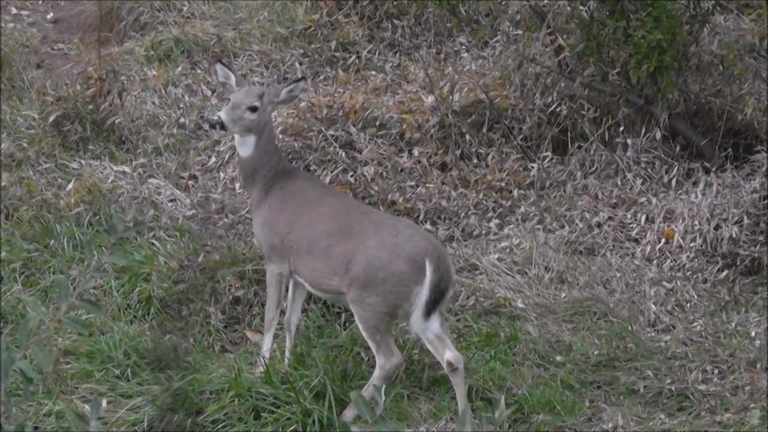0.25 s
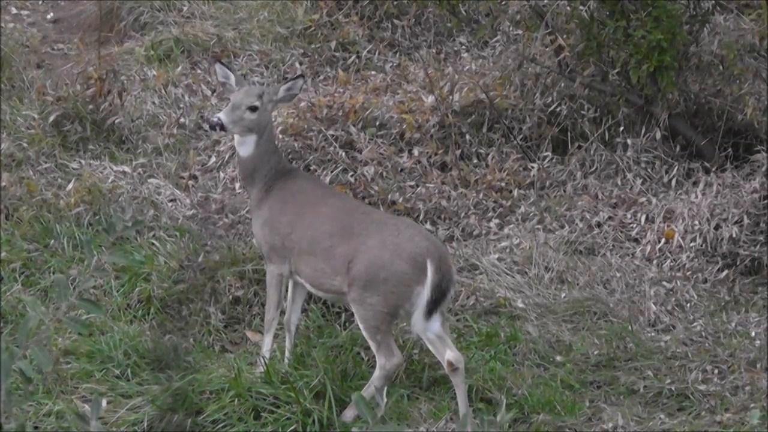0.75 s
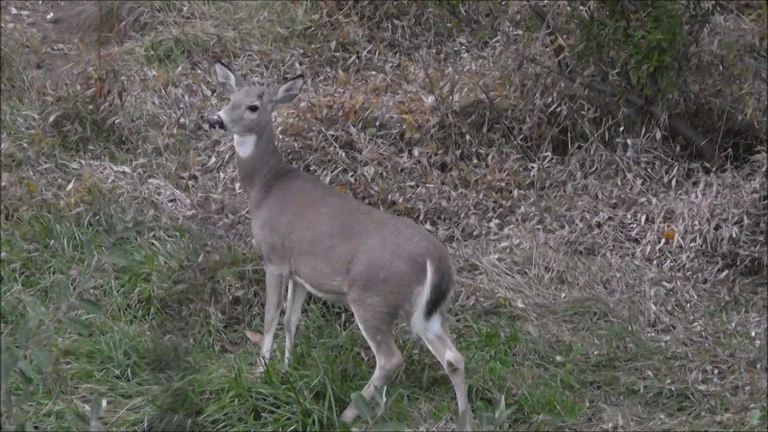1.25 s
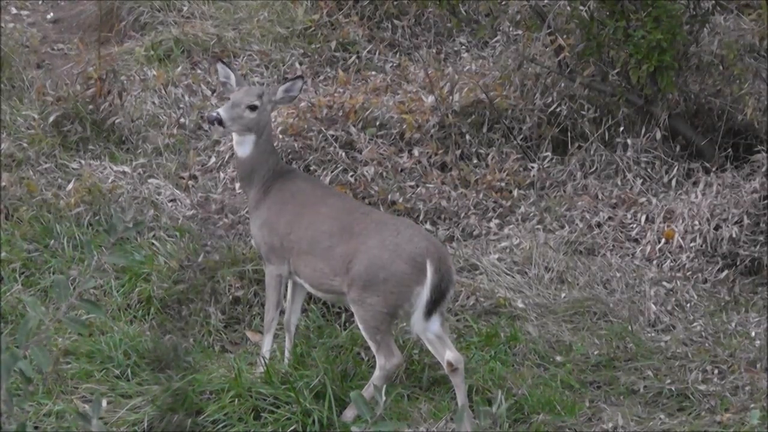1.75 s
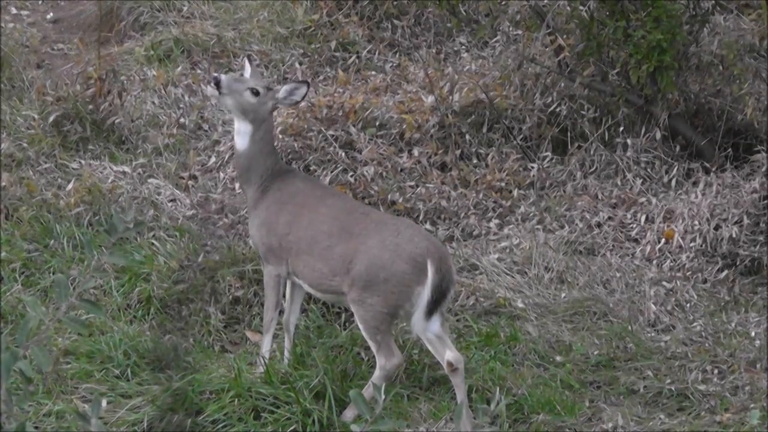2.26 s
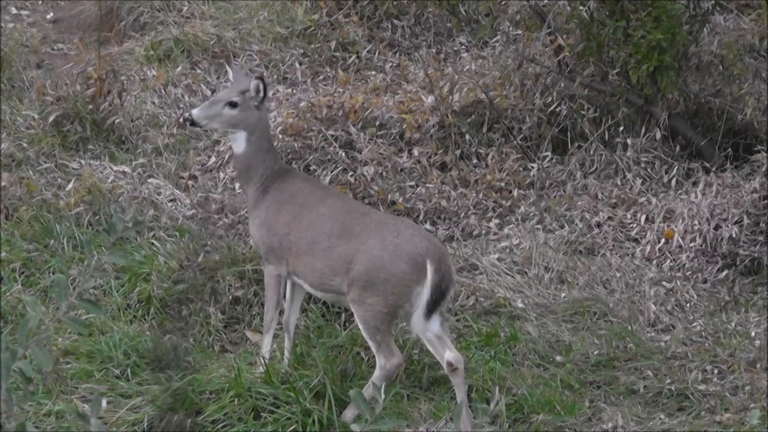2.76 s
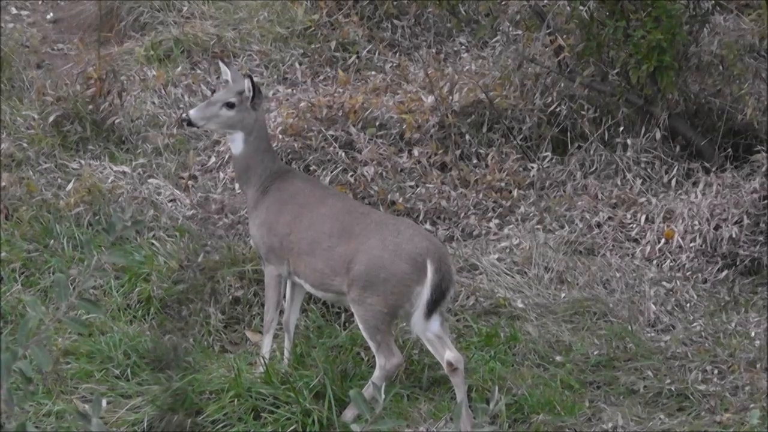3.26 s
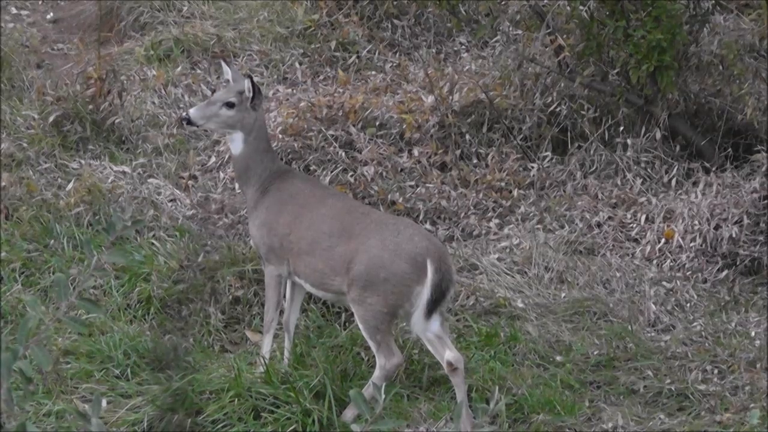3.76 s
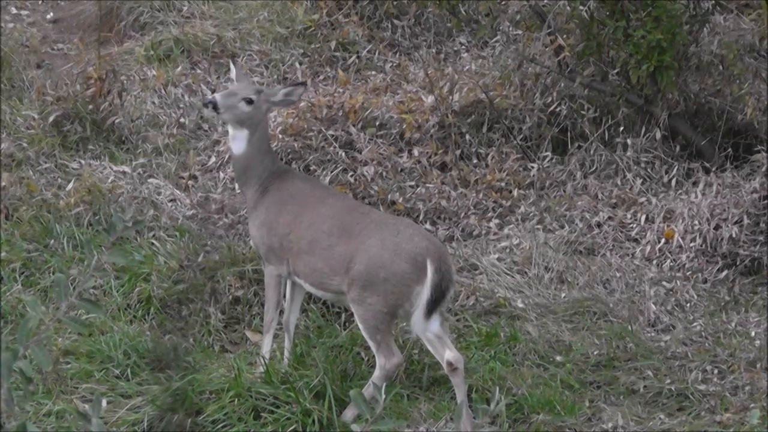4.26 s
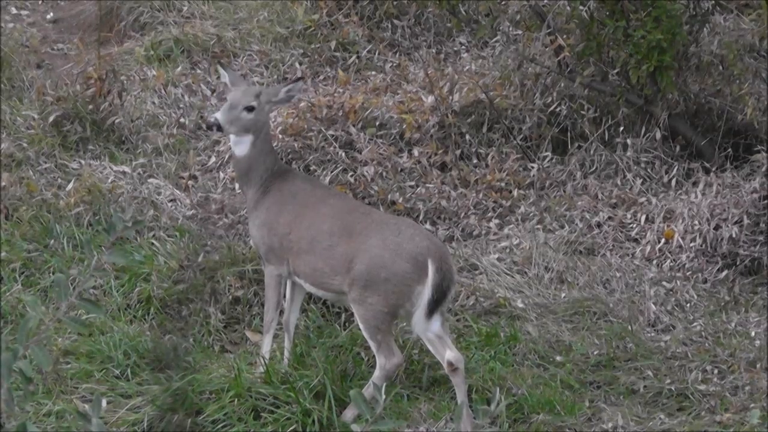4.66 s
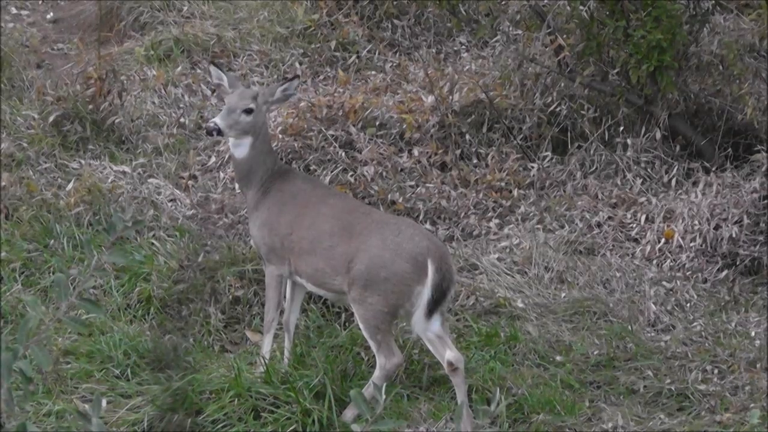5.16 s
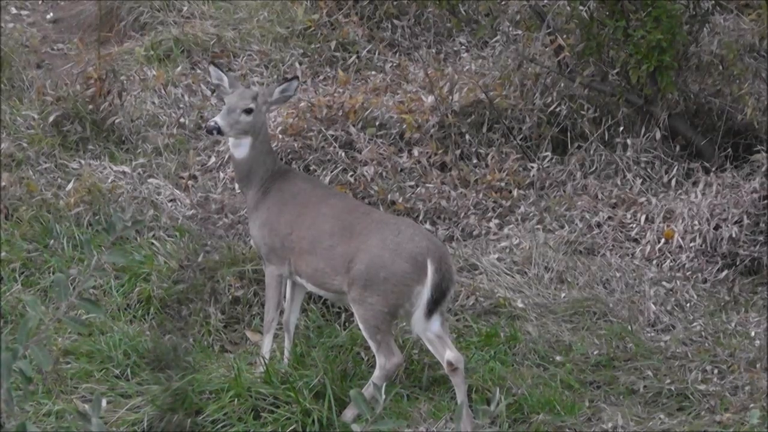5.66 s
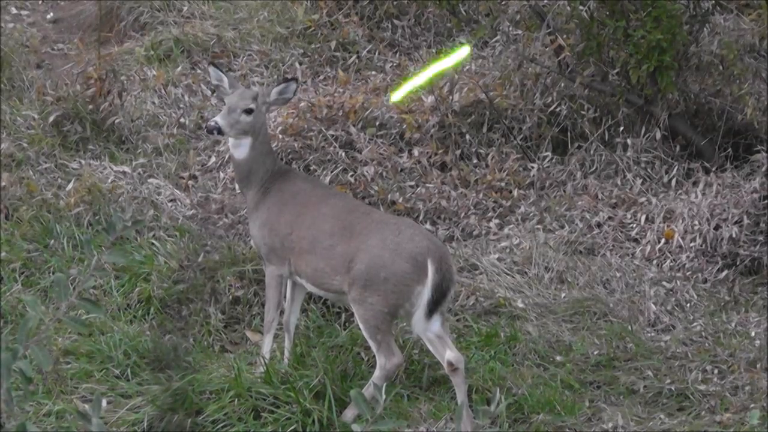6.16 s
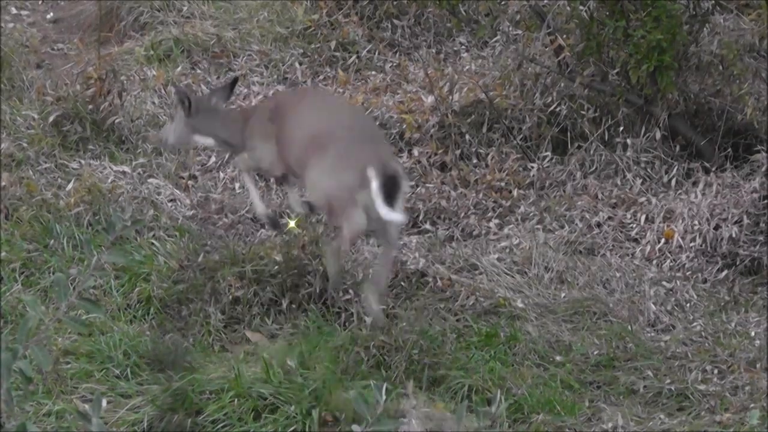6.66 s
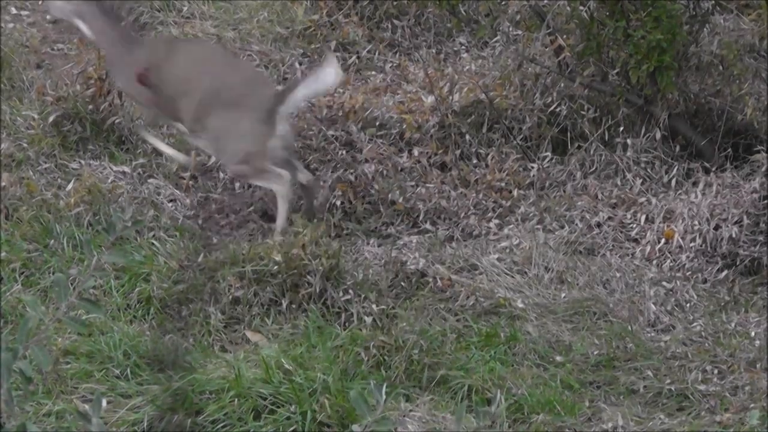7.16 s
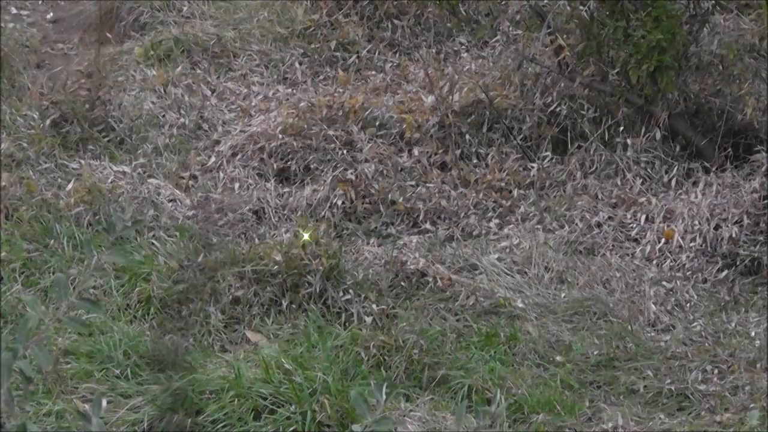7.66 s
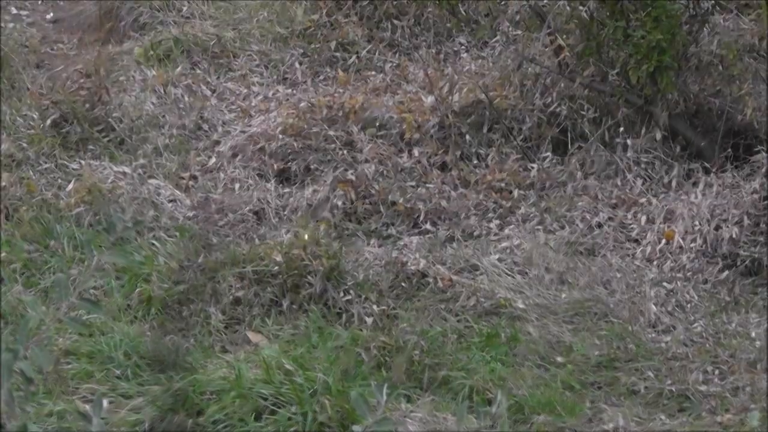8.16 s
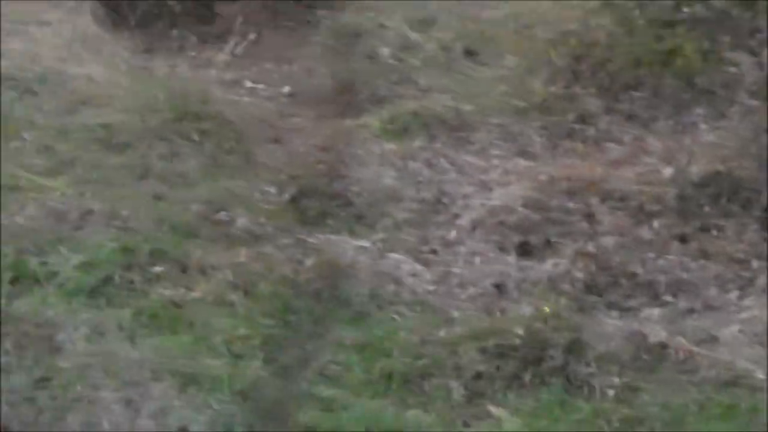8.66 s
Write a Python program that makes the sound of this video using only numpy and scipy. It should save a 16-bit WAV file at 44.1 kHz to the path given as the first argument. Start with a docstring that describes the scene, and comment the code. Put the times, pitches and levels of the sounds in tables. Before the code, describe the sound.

A stereo microphone close to a crossbow hears a calm woodland: faint low air rumble, small hoarse bird chirps, a brief insect trill, an occasional tiny twig tick. Suddenly the bow releases with a hard multi-part snap and low hum; a quarter second later comes a duller hollow impact. Leaves rustle and crunch in uneven bounds, with sharp twig snaps and a woody hoof knock, while the level stays pressed down before recovering.

```python
"""Quiet woods: a low rumble of shaped noise throughout; birds chip as gliding tones from the start, with far calls,
and at 1.1 s a cricket trills in short pulses. Sparse twig snaps are short band-limited puffs of noise.
At 6.2 s a crossbow is loosed close by: noise cracks over decaying modes and a hum. The bolt hisses in flight,
then knocks on a hollow body at 6.46 s; a deer bolts away through crackling leaves, its hooves ringing dead wood.
Gain control drops the level after the loud sounds, holds it down and lets it creep back."""
import sys
import numpy as np
from scipy import signal
from scipy.fft import rfft, irfft
from scipy.io import wavfile
from scipy.ndimage import uniform_filter1d, minimum_filter1d

SR = 44100
rng = np.random.default_rng(int(sys.argv[2]) if len(sys.argv) > 2 else 0)


def amp(db):
    return 10 ** (np.asarray(db, float) / 20)


def bounce(signal):
    """Save signal as a 16-bit WAV file at the path given by the first command-line argument."""
    frames = np.transpose(np.atleast_2d(signal))
    limited = np.clip(frames, -1, 1)
    pcm = np.round(limited * 32767).astype(np.int16)
    wavfile.write(sys.argv[1], SR, pcm)


N = 392479  # samples


def read(points, hz):
    """Interpolation of a spectrum, linear on a log-frequency axis."""
    f, value = np.transpose(points)
    return np.interp(np.log(hz + 1), np.log(f + 1), value)


def evened(x):
    """Normalization to unit rms."""
    return x / np.sqrt(np.mean(x ** 2) + 1e-20)


def add(mix, start_s, sound, lean_db=0):
    """Superposition at a start time, with a left-right level difference."""
    part = mix[:, round(start_s * SR):][:, :sound.shape[-1]]
    part += sound[..., :part.shape[1]] * amp(np.array([[lean_db / 2], [-lean_db / 2]]))


def coloured(x, db_of):
    """Minimum-phase filtering: the cepstrum of the gain db_of(hz) yields a causal response."""
    gain_db = np.maximum(db_of(abs(np.fft.fftfreq(4096, 1 / SR))), -100)
    log_gain = np.log(amp(gain_db))
    taps = np.fft.ifft(np.exp(np.conj(signal.hilbert(log_gain)))).real[:2048]
    return signal.oaconvolve(np.atleast_2d(x), taps[None], axes=1)


def pair(count, same):
    """Partial coherence: two noises that share the correlation `same`."""
    a, b = rng.standard_normal((2, count))
    return np.array([a, same * a + np.sqrt(1 - same ** 2) * b])


def burst(t60_s, same, rise_s):
    """Exponential decay of a noise puff after a linear rise."""
    t = np.arange(round(1.4 * t60_s * SR)) / SR
    return pair(len(t), same) * amp(-60 * t / t60_s) * np.minimum(t / rise_s, 1)


def tone(hz, edge):
    """Phase as the integral of frequency: a sine on a pitch curve with tapered ends."""
    return np.sqrt(2) * np.sin(2 * np.pi * np.cumsum(hz) / SR) * signal.windows.tukey(len(hz), edge)


def modes(table, t):
    """Modal superposition: decaying sines from rows of pitch, level and decay time."""
    return sum(amp(db - 60 * t / t60_s) * np.sin(2 * np.pi * hz * t) for hz, db, t60_s in table)


def woods(x, t60_s, start_s):
    """Multiple scattering from trunks: sparse echoes of random sign that die away."""
    at = np.arange(round(start_s * SR), SR // 2, 40)
    at = at + rng.integers(0, 40, (2, len(at)))
    taps = np.zeros((2, SR // 2 + 40))
    np.put_along_axis(taps, at, rng.standard_normal(at.shape) * amp(-60 * at / SR / t60_s), 1)
    return signal.oaconvolve(x, taps / np.linalg.norm(taps[0]), axes=1)[:, :N]


def patchy(x, frame, depth_db, size):
    """Spectro-temporal modulation: random patches of size (bins, frames) rise and sink."""
    overlap = frame * 3 // 4
    z = signal.stft(x, nperseg=frame, noverlap=overlap)[2]
    field = uniform_filter1d(rng.standard_normal(z.shape[1:]), size=size[0], axis=0)
    field = evened(uniform_filter1d(field, size=size[1], axis=1))
    return signal.istft(z * amp(depth_db * field), nperseg=frame, noverlap=overlap)[1][:, :N]


# Likeness of far sound at the two microphone ports: [pitch_hz, correlation (no unit)]
PORT_LIKENESS = [(60, 0.63), (130, 0.97), (290, 0.91), (640, 0.74), (1410, 0.11), (3100, 0.89),
                 (6820, 0.81), (15000, 0.3)]
# Level difference of the ports: [pitch_hz, left_minus_right_db]
PORT_LEAN = [(60, -5.5), (180, -4), (550, -2.5), (1650, 1), (4970, 0), (15000, 1)]
# Phase difference of the ports: [pitch_hz, left_lead_rad]
PORT_LEAD = [(0, 0.026), (520, 0.11), (2330, 0.14), (3190, 0.0), (15300, 0.012), (16300, 0.038)]


def ports(x):
    """Diffuse-field coherence: two unrelated signals become partly alike at the ports."""
    hz = np.fft.rfftfreq(N, 1 / SR)
    a, b = rfft(x[:, :N])
    same = np.clip(read(PORT_LIKENESS, hz), -1, 1)
    half = amp(read(PORT_LEAN, hz) / 2) * np.exp(.5j * read(PORT_LEAD, hz))
    return irfft(np.array([a * half, (same * a + np.sqrt(1 - same ** 2) * b) / half]), N)


# Spectrum of the background rumble: [pitch_hz, gain_db]
AIR_COLOUR = [(30, -34), (90, -7), (165, 0.5), (318, -0.5), (436, -7), (647, -11.5), (1060, -26.5),
              (1750, -35), (2160, -28.5), (2400, -34.5), (3290, -35), (4630, -41), (15500, -43.5)]


def air():
    """Stationary random noise: a low diffuse rumble with faint drifting patches."""
    noise = patchy(rng.standard_normal((2, N)), 2048, .9, size=(16, 12))
    hz = np.fft.rfftfreq(N, 1 / SR)
    rumble = irfft(rfft(noise) * amp(read(AIR_COLOUR, hz)), N)
    return amp(-47) * evened(ports(rumble))


# The cricket's note: [level_db, pitch_hz, climb_hz_per_s, swell_db_per_s]
TRILL_NOTE = -58.5, 3222, 150, 4
# The cricket's timing: [start_s, pulse_gap_s]
TRILL_TIMING = 1.1465, .0441


def cricket(count=10):
    """Pulsed pure tone: varied pulses drop onto a note that creeps up in pitch and level."""
    out = np.zeros((2, N))
    start_s, gap_s = TRILL_TIMING
    level_db, pitch_hz, climb, swell = TRILL_NOTE
    grace_hz, grace_s = 260, .0013  # each pulse starts about this far above its note
    for s, (a, b, c, d) in zip(gap_s * np.arange(count), rng.standard_normal((count, 4))):
        t = np.arange(0, .018 * (1 + .12 * np.tanh(c)), 1 / SR)
        drop = grace_hz * (1 + .5 * np.tanh(d)) * np.exp(-t / grace_s)
        glide = pitch_hz + climb * s + 8 * a + drop
        add(out, start_s + s, amp(level_db + swell * s + .5 * b) * tone(glide, 0.49), 1.5)
    return out + amp(-8) * woods(out, 0.31, 0.012)


# Bird chips, levels before the trees: [start_s, level_db, top_hz, last_hz, upsweep_re_top_db]
CHIPS = [(0.337, -71, 5700, 5130, -20), (1.304, -60.5, 5540, 4770, -8), (1.497, -70.5, 5770, 5100, -20),
         (2.04, -62.5, 5580, 4770, -3.5), (2.806, -64.5, 5730, 5160, -6), (3.383, -68.5, 5590, 5130, -25),
         (3.537, -61.5, 5780, 5230, -9), (4.364, -65, 5900, 4820, -25), (4.76, -58.5, 5580, 5050, -8.5),
         (5.341, -57.5, 5590, 5200, -6.5), (5.793, -71.5, 5770, 5100, -20), (6.125, -59.5, 5400, 5100, -5)]
# Bare upsweeps, levels before the trees: [start_s, level_db, first_hz, last_hz]
FLICKS = [(1.19, -71, 3300, 4800), (1.56, -72, 3480, 4800), (1.739, -69, 3470, 5000),
          (1.925, -70, 2750, 4600), (2.121, -69, 2600, 4400), (2.315, -70, 2860, 5430),
          (2.845, -67, 6800, 7870)]
# Far calls with an arched pitch: [start_s, length_s, level_db, edge_hz, crest_hz]
HOOTS = [(0.418, 0.11, -64.5, 1260, 1377), (0.439, 0.1, -77, 1520, 1610), (0.68, 0.083, -70, 950, 976)]


def birds():
    """Frequency modulation: hoarse chips climb and slide down among echoes; far calls arch."""
    out, far = np.zeros((2, 2, N))
    chip_s, climb_s, sweep_s = .05, .024, .018
    t = np.arange(0, chip_s, 1 / SR)
    flutter = evened(uniform_filter1d(rng.standard_normal((len(CHIPS), SR // 10)), size=60, axis=1))
    for (s, db, top_hz, last_hz, sweep_db), shake in zip(CHIPS, flutter):
        # the climb starts at 0.58 of the top pitch
        hz = top_hz * (1 - (1 - .58) * np.clip(1 - t / climb_s, 0, 1) ** 1.4)
        slide = np.sin(np.pi / 2 * np.clip((t - climb_s) / (chip_s - climb_s), 0, 1)) ** 2.5
        hz = hz - (top_hz - last_hz) * slide
        swell_db = sweep_db * np.clip(2 - 2 * t / sweep_s, 0, 1)
        hoarse = 1 + (0.22 + .6 * np.exp(-t / sweep_s)) * shake[:len(t)]
        add(out, s, amp(db + swell_db - 5.5 * slide) * hoarse * tone(hz, 0.25))
    for s, db, first_hz, last_hz in FLICKS:
        add(out, s, amp(db) * tone(np.linspace(first_hz, last_hz, round(.021 * SR)), 0.49))
    for s, length_s, db, edge_hz, crest_hz in HOOTS:
        u = np.linspace(-1, 1, round(length_s * SR))
        add(far, s, amp(db) * tone(crest_hz - (crest_hz - edge_hz) * u ** 2, 0.34))
    near_echo = amp(-3.5) * woods(out, .14, .003)
    late_echo = amp(-1) * woods(out, 0.45, .015)
    return amp(-2.5) * out + near_echo + late_echo + far


# Modes of a fallen branch: [pitch_hz, level_db, t60_s]
LOG_MODES = [(604, -2, 0.019), (800, 2, 0.019), (1090, -4, 0.023), (1380, -1, 0.031), (1520, -8, .025)]
# Hooves on dead wood: [start_s, level_db]
LOG_HITS = [(7.8314, -32.5), (7.8915, -48), (8.066, -47)]


def hooves():
    """Impact excitation of modes: a hoof rings a fallen branch."""
    out, t = np.zeros((2, N)), np.arange(SR // 10) / SR
    ring = modes(LOG_MODES, t) * np.minimum(t / 0.00083, 1)
    for s, db in LOG_HITS:
        add(out, s, amp(db) * ring)
    return out + amp(-15.0) * woods(out, .1, 0.00327)


def snap_band_db(hz, mid_hz, a, b):
    """Band-pass resonance: skirts, a peak and chance bumps over octaves from the middle."""
    span = 1.55  # the band edges lie this factor from the middle
    ratio = (hz + 1) / mid_hz
    octaves = np.log2(ratio)
    skirts = -10 * np.log10((1 + (ratio * span) ** -1.1) * (1 + (ratio / span) ** 7))
    bumps = np.sin(2 * np.pi * ((1 + a) * octaves + b))
    return skirts + 5 * np.exp(-(octaves / .35) ** 2) + 1.5 * bumps


# Twigs and hooves: [start_s, peak_db, middle_hz, left_minus_right_db, t60_s]
SNAPS = [(2.366, -46, 2300, -3, 0.016), (4.974, -46.5, 2600, -2, 0.012), (6.8887, -27, 3800, -11, 0.017),
         (6.94, -37.5, 4000, -13, 0.05), (7.096, -32.5, 5800, -5, 0.0083), (7.0965, -40.5, 1050, -14, .018),
         (7.155, -38.5, 2600, 0, 0.021), (7.253, -38, 2300, -1, 0.05), (7.3857, -35.5, 2900, -3, 0.023),
         (7.405, -33.5, 2600, -2, .023), (7.4281, -29, 2110, -3, 0.019), (7.4294, -30.5, 5040, -1, .025),
         (7.587, -39, 2740, -1, .01), (7.674, -41.5, 3020, -2, 0.03), (7.811, -38, 3380, -2, 0.022),
         (7.833, -38, 3280, -2, .02), (7.955, -42, 5300, -3, .015), (7.973, -40.5, 3160, 0, 0.016),
         (8.247, -42, 2200, 0, 0.025), (8.2833, -36, 2690, -2, 0.04), (8.5168, -24, 6700, 2.5, 0.01),
         (8.5176, -42, 800, 3, .018), (8.6243, -39, 7000, 8, 0.018), (8.631, -37, 8950, 1, 0.017),
         (8.6317, -33.5, 4870, 0, 0.02), (8.727, -41.5, 5960, 4, 0.027), (8.825, -47, 4600, -5, 0.023),
         (8.841, -42.5, 7800, -5, .0069)]


def snaps():
    """Transient fracture: each twig or hoof is a short noise puff in its own band."""
    out = np.zeros((2, N))
    for (s, db, mid_hz, lean_db, t60_s), (a, b) in zip(SNAPS, rng.random((len(SNAPS), 2))):
        snap = coloured(burst(t60_s, .92, .0005), lambda hz: snap_band_db(hz, mid_hz, a, b))
        add(out, s, amp(db) * snap / abs(snap).max(), lean_db)
    return out + amp(-16.0) * woods(out, 0.15, 0.0044)


# Edges of the bands in which leaves of each size crackle: [edge_hz]
GRAIN_EDGES = 200, 1500, 2600, 4200, 6500, 10000, 17000


def crackle():
    """Random impulse process: each size of leaf has uneven, clumped grains in its own band."""
    out, both = np.zeros((2, N)), evened(uniform_filter1d(rng.standard_normal(N), size=600))
    for low_hz, high_hz in zip(GRAIN_EDGES, GRAIN_EDGES[1:]):
        clumps = evened(uniform_filter1d(rng.standard_normal(N), size=500))
        uneven = np.minimum(rng.exponential(1, (2, N)), 4.3)
        size = amp(3.6 * uneven + 1.2 * both + 1.5 * clumps)
        struck = rng.random((2, N)) < 5000 / SR  # about 5000 grains a second
        grains = evened(size * rng.standard_normal((2, N)) * struck)
        band = signal.butter(2, [low_hz, high_hz], "bandpass", fs=SR, output="sos")
        out += signal.sosfilt(band, grains)
    return out


# Usual spectrum of the leaves: [pitch_hz, gain_db]
LEAF_COLOUR = [(470, -34), (800, 1.5), (1180, -4.5), (1550, -4.5), (2130, -7.5), (6300, -9), (7930, -22),
               (15600, -24)]
# Bed of rustling leaves, brighter until 7.5 s, then duller: [time_s, level_db, treble_re_usual_db]
RUSTLE = [(6.462, -38.5, 2), (6.56, -50.5, -1), (6.62, -53, 2.5), (6.85, -54.5, 4.5), (7.03, -59.5, 5),
          (7.5, -55, 5), (7.78, -60.5, 0.5), (8.0, -65, -0.5), (8.18, -80, 0), (8.45, -58, 0.5),
          (8.66, -64, -1), (8.9, -61.5, 1)]
# Strides through the leaves: [crest_s, level_db, fade_s, low_crunch_re_usual_db]
STRIDES = [(6.49, -47, 0.021, -32.5), (6.69, -51, 0.051, -5), (7.12, -58, 0.057, -12),
           (7.261, -50, 0.033, -4), (7.451, -45, 0.018, -23), (7.55, -56.5, 0.033, -8),
           (7.7, -58, 0.061, -14), (7.86, -53.5, 0.13, -3), (7.94, -58.5, 0.023, 12),
           (8.0, -54, 0.072, -16), (8.215, -56, 0.053, -9), (8.3, -52, 0.053, 0), (8.38, -50.5, 0.057, -20),
           (8.55, -55.5, 0.044, -9), (8.71, -57.5, 0.04, -5)]


def leaves():
    """Addition of incoherent powers: a crackling bed, and strides that swell and fade."""
    s, db, bright_db = np.transpose(RUSTLE)
    t = np.arange(N) / SR
    grains = crackle()
    grains = patchy(grains + amp(-4.0) * woods(grains, 0.28, 0.000989), 256, 1.65, size=(5, 18))
    hz = np.fft.rfftfreq(N, 1 / SR)
    body = rfft(evened(coloured(grains, lambda f: read(LEAF_COLOUR, f))[:, :N]))
    low, high = 1 / (1 + (hz / 1500) ** 6), 1 - 1 / (1 + (hz / 7600) ** 8)
    power = amp(2 * np.interp(t, s, db, left=-200))  # doubled dB makes amp() a power
    crunch = power * amp(2 * -2.5)
    for crest_s, stride_db, fade_s, crunch_db in STRIDES:
        fall = np.where(t < crest_s, ((t - crest_s) / .029) ** 2, (t - crest_s) / fade_s)
        shape = (t > s[0]) * np.exp(-fall)
        power = power + amp(2 * stride_db) * shape
        crunch = crunch + amp(2 * (stride_db + crunch_db)) * shape
    middle = irfft(body * (1 - low - high), N)
    treble = irfft(body * high, N) * amp(np.interp(t, s, bright_db))
    return ports((middle + treble) * np.sqrt(power) + irfft(body * low, N) * np.sqrt(crunch))


# The bolt is in the air: [from_s, to_s]
FLIGHT_TIME = 6.25, 6.46
# Spectrum of its hiss: [pitch_hz, gain_db]
FLIGHT_COLOUR = [(500, -11), (1000, -12), (1380, -8), (2330, -7), (3290, -4.5), (6500, -13), (8500, -18),
                 (15500, -21)]


def flight():
    """Broadband flow noise: a hiss swells, then holds while the bolt flies."""
    t = np.arange(N) / SR
    from_s, to_s = FLIGHT_TIME
    hiss = evened(coloured(pair(N, .75), lambda hz: read(FLIGHT_COLOUR, hz))[:, :N])
    hiss = patchy(hiss, 256, 2.0, size=(6, 20))
    return amp(-50.5) * hiss * np.clip((t - from_s) / .042, 0, 1) * (t < to_s)


# The bolt strikes: [start_s, level_db, t60_s, body_ring_db]
KNOCK = [(6.4603, -4.5, 0.026, -12), (6.4632, -4, 0.017, -1), (6.4662, -9.5, 0.019, 3),
         (6.4735, -17.5, 0.059, -13)]
# Spectrum of the blow: [pitch_hz, gain_db]
KNOCK_COLOUR = [(500, -6.5), (1090, -3), (1410, -4), (1820, -12.5), (2900, -11), (4800, -16), (6200, -10),
                (7500, -16.5), (9000, -31), (11000, -27), (16000, -37)]
# Modes of the struck body: [pitch_hz, level_db, t60_s]
HOLLOW = [(107.3, -34.5, 0.14), (402, -31, 0.033), (536, -20, 0.027), (730, -13.5, 0.012), (1210, -28, .04)]


def knock():
    """Impact on a cavity: dull far blows ring a hollow body, with scatter from the trees."""
    out, t = np.zeros((2, N)), np.arange(SR // 10) / SR
    hollow = modes(HOLLOW, t) * np.minimum(t / 0.00087, 1)
    for s, db, t60_s, ring_db in KNOCK:
        blow = coloured(burst(t60_s, 0.99, 0.00042), lambda hz: read(KNOCK_COLOUR, hz))
        add(out, s, amp(db) * blow, -2.5)
        add(out, s, amp(ring_db) * hollow, -2.5)
    return out + amp(-18.0) * woods(out, 0.99, 0.028)


# String release, then limb slaps; cracks play 6 dB above level_db:
# [start_s, level_db, t60_s, treble_tilt_db_per_octave, bow_ring_db]
SHOT = [(6.195, -14, 0.03, 4, -25), (6.198, -3.5, 0.025, 1, -21), (6.2006, -8, .035, 3.5, -30),
        (6.207, 1, 0.025, -7.5, -21), (6.2093, -3.5, .022, -3, -14), (6.214, 1, 0.04, -12, -26),
        (6.223, -7, .07, -15, -33), (6.245, -33, 0.11, -1, -50)]
# Spectrum of a crack before its tilt: [pitch_hz, gain_db]
SHOT_COLOUR = [(250, -10.5), (700, -8.5), (1250, -8.5), (3400, -5.5), (4570, -7.5), (6650, -10), (8100, -7),
               (9000, -16), (11600, -21.5), (14100, -18.5), (15700, -26)]
# Modes of the bow: [pitch_hz, level_db, t60_s]
BOW = [(706, -7, 0.066), (1370, -7, .035), (2140, -2, 0.027), (2610, 3, .022), (2960, -8, 0.021),
       (3300, 0.5, 0.036), (3960, 0, 0.041), (4300, -6, .025), (6520, -9, .02), (8300, -3, .01)]
# Level difference of the cracks and ring: [pitch_hz, left_minus_right_db]
SHOT_LEAN = [(60, 7), (180, -7), (550, -2), (1650, -9), (4970, -4), (15000, 3)]
# The stock jolts at release and as the limbs stop: [start_s, pitch_hz, level_db, t60_s]
THUMP = [(6.196, 104, -10.5, 0.059), (6.195, 250, -30, 0.033), (6.195, 423, -17.5, 0.033),
         (6.195, 530, -12, 0.023), (6.208, 155, -24, 0.036), (6.207, 260, -14.5, 0.038)]
# Hum after the shot: [pitch_hz, level_db, t60_s, throbs_per_s, throb_depth (no unit)]
HUM = [(200, -36.5, 1.0, 9, .12), (70, -54, 1.3, 14.8, .95), (720, -57, 1.0, 6, .3)]


def crossbow():
    """Release of stored elastic energy: slaps crack and ring the bow, stock thumps, all hums on."""
    out, t = np.zeros((2, N)), np.arange(SR // 2) / SR
    ring_t = t[:SR // 10]
    for s, db, t60_s, tilt_db, ring_db in SHOT:
        puff = burst(t60_s, 0.21, 0.00047)
        crack = coloured(puff, lambda hz: read(SHOT_COLOUR, hz) + tilt_db * np.log2(hz / 2500 + 1))
        add(out, s, amp(db + 6) * crack)
        for (hz, mode_db, mode_t60_s), (a, b) in zip(BOW, rng.random((len(BOW), 2))):
            turns = hz * ring_t + a + np.array([[0], [.4 * b]])  # chance phase, differing by port
            add(out, s, amp(ring_db + mode_db - 60 * ring_t / mode_t60_s) * np.sin(2 * np.pi * turns))
    left = coloured(out[0], lambda hz: read(SHOT_LEAN, hz) / 2)
    right = coloured(out[1], lambda hz: -read(SHOT_LEAN, hz) / 2)
    out = np.vstack([left, right])[:, :N]
    out = out + amp(-30.0) * woods(out, 0.19, 0.033)
    port_t = t - np.array([[0], [.0027]])  # the right port feels the jolt later
    for s, hz, db, t60_s in THUMP:
        swing = np.sin(2 * np.pi * hz * port_t) * np.minimum(t / 0.0011, 1)
        add(out, s, -amp(db - 60 * t / t60_s) * swing, -3)
    for hz, db, t60_s, rate, depth in HUM:
        throb = 1 + depth * np.cos(2 * np.pi * rate * (t - .012))
        add(out, SHOT[0][0], amp(db - 60 * t / t60_s) * throb * tone(hz + 0 * t, 0.29))
    return out


def scene():
    """Linear superposition of all sources at the microphone."""
    background = air() + cricket() + birds()
    deer = hooves() + snaps() + leaves()
    return background + deer + flight() + knock() + crossbow()


def top_cut(x):
    """Nothing passes above the cut-off."""
    return signal.sosfilt(signal.butter(12, 16680, fs=SR, output="sos"), x)


# Dips of the microphone housing: [middle_hz, width_hz, depth_db]
DIPS = [(1790, 80, -9.5), (2356, 163, -5), (3063, 52, -17)]


def record(dry):
    """Dynamic range compression after housing dips and a band limit at 15850 Hz, then a soft ceiling."""
    def response_db(hz):
        """Linear filtering: narrow housing dips, and a band limit 32 dB deep above 15850 Hz."""
        dips = sum(db * np.exp(-((hz - f) / w) ** 2) for f, w, db in DIPS)
        return dips - 32 * (1 + np.tanh((hz - 15850) / 40)) / 2

    x = coloured(dry, response_db)[:, :N]
    power_db = 10 * np.log10(signal.lfilter([.004], [1, -.996], (x ** 2).mean(0)) + 1e-12)
    over_db = np.maximum(power_db + 28.5, 1e-3)  # excess over a threshold of -28.5 dB
    hold = 2 * round(.11 * SR) + 1  # samples
    held_db = -minimum_filter1d(-over_db, size=hold, origin=hold // 2)  # highest of the past 0.22 s
    fall = np.arange(N) / (.14 * SR)  # the excess dies away with a time constant of 0.14 s
    kept_db = np.exp(np.maximum.accumulate(np.log(held_db) + fall) - fall)
    keep = np.exp(-1 / (0.0023 * SR))  # 2.3 ms attack
    cut_db = signal.lfilter([1 - keep], [1, -keep], 0.83 * kept_db)
    ceiling = .5  # peaks round off below this
    finished = ceiling * np.tanh(x / amp(cut_db) / ceiling)
    return top_cut(finished)


dry = scene()
out = record(dry)
bounce(out)
```